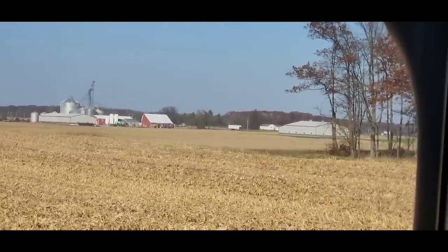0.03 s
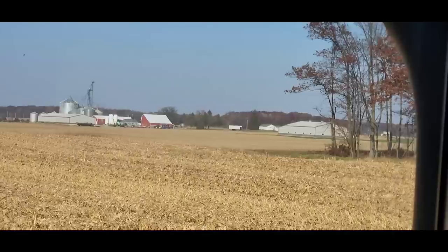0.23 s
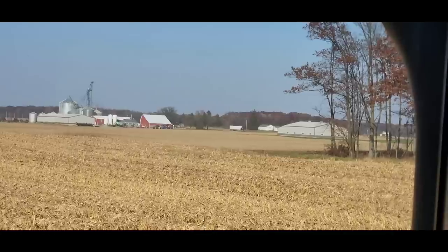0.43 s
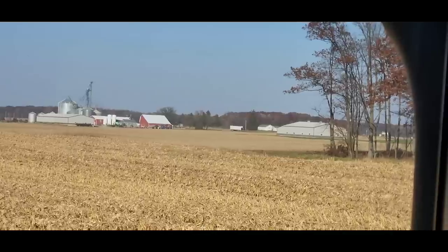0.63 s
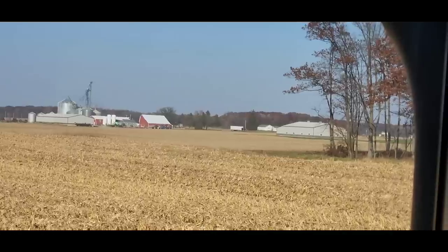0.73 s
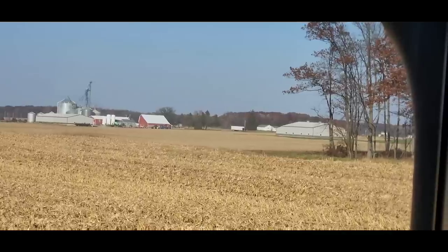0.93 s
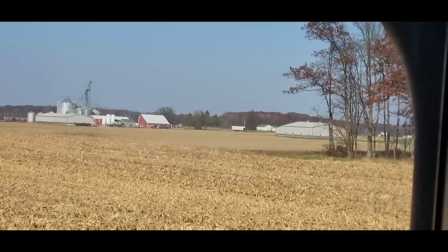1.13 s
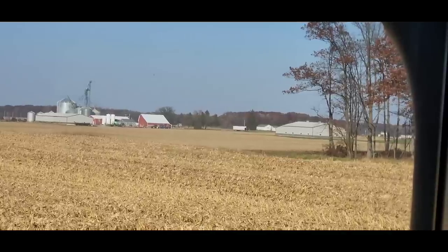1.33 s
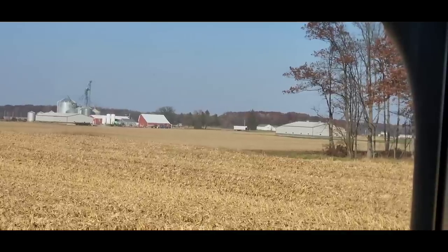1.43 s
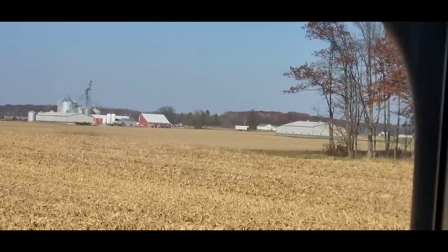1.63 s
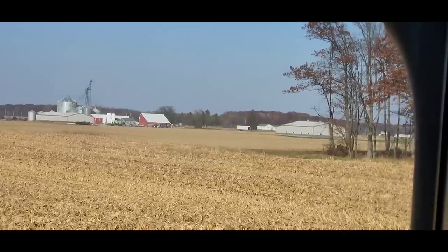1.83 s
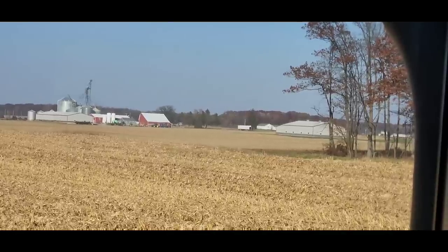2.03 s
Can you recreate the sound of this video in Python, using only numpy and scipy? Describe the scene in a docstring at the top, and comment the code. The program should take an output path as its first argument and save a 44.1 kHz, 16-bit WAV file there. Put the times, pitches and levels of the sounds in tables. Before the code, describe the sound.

Inside the cab of a working combine, a continuous low drone swells and wavers over muffled machinery rush; soft thuds come in the first half, with faint gear whine and thin high hiss above.

```python
"""Inside the closed cab of a combine harvester working at steady speed.
The cab booms in swells over filtered-noise rumble; soft knocks ring its low modes as decaying sines.
Shafts, belts and gears hum and whine as sines, two hums and a faint whistle vary in pitch,
and shaped noise makes the rush of threshing and fans, with a hiss above.
A thin, very high sizzle of narrow-band noise flutters on top."""
import sys
import numpy as np
from scipy import signal
from scipy.fft import rfft, irfft, next_fast_len
from scipy.io import wavfile
from scipy.ndimage import map_coordinates

SR = 44100
rng = np.random.default_rng(int(sys.argv[2]) if len(sys.argv) > 2 else 0)


def dump(signal):
    """Clip the signal to [-1, 1] and save it as 16-bit WAV at the path in sys.argv[1]."""
    limited = np.clip(np.atleast_2d(signal).T, -1, 1)
    pcm = np.round(limited * 32767).astype(np.int16)
    wavfile.write(sys.argv[1], SR, pcm)


N = 91816
TIME_S = np.arange(N) / SR


def amp(db):
    """Decibels to gain."""
    return 10 ** (np.asarray(db) / 20)


def unit(x):
    """Scale to rms 1 over all channels."""
    return x / np.sqrt(np.mean(x ** 2) + 1e-20)


def along(points, hz):
    """Read (Hz, value) points on a log frequency axis."""
    point_hz, value = np.transpose(points)
    return np.interp(np.log(hz + 1), np.log(point_hz + 1), value)


def curve(rows):
    """One value per sample from (seconds, value) rows."""
    return np.interp(TIME_S, *np.transpose(rows))


def wobble(knots_per_s):
    """Smooth random curve through normally distributed knots."""
    knots = rng.standard_normal(1024)
    return map_coordinates(knots, [TIME_S * knots_per_s], mode="mirror")


def filtered(x, response):
    """Multiply the spectrum of x by a response of frequency."""
    size = next_fast_len(N + SR // 2)  # zero padding
    hz = np.fft.rfftfreq(size, 1 / SR)
    return irfft(rfft(x, size) * response(hz), size)[..., :N]


def sides(difference):
    """Split a left-right difference over the two channels."""
    return np.array([[.5], [-.5]]) * difference


def tone(hz, lead_rad=0):
    """Stereo sine of rms 1 on a pitch curve, left ahead of right by lead_rad."""
    phase = 2 * np.pi * (np.cumsum(hz) / SR + rng.random())
    return np.sqrt(2) * np.sin(phase + sides(lead_rad))


# Stereo width of all noise. Each row: frequency in Hz, side level under the mid in dB.
SIDE_WIDTH = [(40, -30), (90, -12.5), (160, -12.5), (260, -12), (380, -3), (560, -4), (700, -3.5),
              (1000, 1), (1450, 2), (2000, -1), (4000, -0.3), (12000, 1)]
# Stereo balance of all noise. Each row: frequency in Hz, left over right in dB.
NOISE_BALANCE = [(50, 2), (100, 1.5), (200, 0), (400, 0), (700, 0), (850, -1), (1300, 1.5), (2200, -3),
                 (4300, -1.5), (5300, 2), (7000, -2), (14000, 6)]


def noise(spectrum):
    """Stereo noise of rms 1: mid and side sources, alike in the bass and diffuse in the treble."""
    def side_gain(hz):
        return amp(along(SIDE_WIDTH, hz))

    def colour(hz):
        level_db = along(spectrum, hz) + sides(along(NOISE_BALANCE, hz))
        return amp(level_db) / np.hypot(1, side_gain(hz))  # total power independent of width

    mid, side = rng.standard_normal((2, N))
    side = filtered(side, side_gain)
    return unit(filtered(np.array([mid + side, mid - side]), colour))


# Boom swells. Each row: time in seconds, level in dB before BOOM_TRIM_DB.
BOOM_LEVEL = [(0, -35), (.03, -34.5), (.12, -46.5), (.18, -36), (.22, -30), (.32, -37), (.42, -36),
              (.455, -21.5), (.52, -45.5), (.59, -25), (.68, -40), (.8, -35), (.9, -33), (1.0, -36.5),
              (1.07, -55), (1.15, -34), (1.22, -32.5), (1.37, -42.5), (1.47, -34), (1.56, -34), (1.64, -47),
              (1.7, -29.5), (1.77, -44.5), (1.83, -31.5), (1.92, -41.5), (2.05, -32)]
# Boom pitch. Each row: time in seconds, pitch in Hz before the random wander.
BOOM_PITCH_HZ = [(0, 81.5), (.22, 91.5), (.33, 89), (.41, 77.5), (.47, 86), (.57, 85.5), (.66, 92.5),
                 (.77, 79), (.89, 89), (1.0, 77.5), (1.14, 87), (1.24, 81), (1.46, 87), (1.55, 83),
                 (1.7, 88), (1.85, 81.5), (2.05, 90.5)]
BOOM_WANDER_HZ, BOOM_WANDER_KNOTS_PER_S, BOOM_TRIM_DB = 3.63, 30.39, -2.5
# Rumble spectrum. Each row: frequency in Hz, relative density in dB per Hz.
RUMBLE_SPECTRUM = [(30, -37.5), (50, -5.5), (62, -.5), (80, -3), (115, -1.5), (150, -10.5), (250, -31.5),
                   (600, -105)]
RUMBLE_DB = -38.5
# Deepest rumble. Each row: time in seconds, level in dB.
DEEP_RUMBLE_LEVEL = [(0, -37), (.2, -58), (.37, -36.5), (.46, -45), (.67, -43), (.75, -47), (1.05, -46.5),
                     (1.15, -38), (1.25, -44), (1.49, -35), (1.57, -50), (1.71, -41.5), (1.78, -48),
                     (2.05, -45)]
# Deepest rumble spectrum. Each row: frequency in Hz, relative density in dB per Hz.
DEEP_RUMBLE_SPECTRUM = [(15, -25), (26, 3.5), (37, 11), (45, 4), (54, 11), (66, -21), (100, -57),
                        (200, -120)]


def cab():
    """The cab's air resonance booms in uneven swells of wavering pitch over two bands of rumble."""
    boom_hz = curve(BOOM_PITCH_HZ) + BOOM_WANDER_HZ * wobble(BOOM_WANDER_KNOTS_PER_S)
    boom = amp(curve(BOOM_LEVEL) + BOOM_TRIM_DB) * tone(boom_hz)
    rumble = amp(RUMBLE_DB) * noise(RUMBLE_SPECTRUM)
    deep_rumble = amp(curve(DEEP_RUMBLE_LEVEL)) * noise(DEEP_RUMBLE_SPECTRUM)
    return boom + rumble + deep_rumble


# Drone of the heavy shafts. Each row: mean pitch in Hz, level in dB.
SHAFT_DRONE = [(45, -44.5), (82.7, -46), (120.3, -52.5), (164, -54.5), (206, -60), (242, -60), (281, -62.5),
               (298, -63.5), (315, -56.5), (345, -64.5), (361, -65.5), (382, -66.5), (416, -58)]
# Tones of the drive. Each row: mean pitch in Hz, level in dB before flutter and WHINE_TRIM_DB,
# left over right in dB, left lead in radians.
DRIVE_WHINES = [(483.4, -58.5, -1, -.4), (495, -64.5, 3, .7), (517.6, -63, 5, 1.3), (562.6, -65, 8, .6),
                (570.1, -56, 6, -.2), (705, -71, 12, -1.4), (725, -66, 8, -2.1), (765.3, -68, -5, -.7),
                (836.6, -66.5, 7, -.1), (906, -72, 0, 1), (976, -72, 0, -1.1), (1087.4, -74, -12, 1.4),
                (1140.2, -58.3, 4, -.3), (1152.1, -61, 3, -2.2), (1170.2, -70.5, 3, -3),
                (1444.4, -74, 0, -1.3), (1449.8, -73, 2, -3), (1710.3, -65.5, -4, -1.7),
                (1755.4, -76, 1, .1), (1812.5, -74, 3, -.7), (1994, -75, 0, .6), (2054, -78, -2, -1),
                (2114, -77, 0, 1), (2158.4, -73, 2, -.8), (2280.6, -78, -5, .6), (2295.5, -72.5, -11, 1.2),
                (2340.6, -74, 6, -2.6), (2537, -82, 4, 1.5), (5488, -89, 5, -2.4)]
SPEED_DRIFT_RATIO, SPEED_DRIFT_KNOTS_PER_S = 0.00062, 4.4
WHINE_FLUTTER_DB, WHINE_FLUTTER_KNOTS_PER_S, WHINE_TRIM_DB = 2.5, 10.99, 1.5


def drive():
    """Shafts drone and gears whine, all scaled by one slightly drifting speed; close pairs beat."""
    speed = 1 + SPEED_DRIFT_RATIO * wobble(SPEED_DRIFT_KNOTS_PER_S)
    drone = sum(amp(db) * tone(hz * speed) for hz, db in SHAFT_DRONE)
    whine = 0
    for hz, db, pan_db, lead_rad in DRIVE_WHINES:
        flutter_db = WHINE_FLUTTER_DB * wobble(WHINE_FLUTTER_KNOTS_PER_S)
        whine += amp(db + sides(pan_db) + flutter_db) * tone(hz * speed, lead_rad)
    return drone + amp(WHINE_TRIM_DB) * whine


# Gliding hum, probably a fan or pump under changing load.
# Each row: time in seconds, pitch in Hz, level in dB.
GLIDING_HUM = [(0, 308, -45), (0.149, 277, -50), (0.299, 245, -50), (.55, 245, -53), (0.721, 265, -50.5),
               (.87, 276, -43.5), (0.938, 295, -65), (1.011, 309, -51.5), (1.17, 280, -50),
               (1.32, 262, -54), (1.549, 266, -55), (1.68, 272, -48), (1.85, 262, -51), (1.991, 243, -46.5),
               (2.08, 250, -50)]
# Wavering gear hum. Each row: time in seconds, level in dB before HUM_TRIM_DB.
GEAR_HUM_LEVEL = [(0, -61), (.32, -65), (.4, -65), (.57, -46.5), (.7, -55), (.83, -47), (.97, -50),
                  (1.15, -59), (1.4, -68), (1.6, -54), (2.05, -58.5)]
HUM_MEAN_HZ, HUM_WANDER_HZ, HUM_WANDER_KNOTS_PER_S = 565, 6.14, 25
HUM_TRIM_DB, HUM_PAN_DB = -2.8, 5  # pan is left over right


def hums():
    """One low hum glides in pitch; a higher one wavers at random and beats with the gear tones."""
    time_s, glide_hz, glide_db = np.transpose(GLIDING_HUM)
    glide_gain = amp(curve(np.c_[time_s, glide_db]))
    glide = glide_gain * tone(curve(np.c_[time_s, glide_hz]))
    waver_hz = HUM_MEAN_HZ + HUM_WANDER_HZ * wobble(HUM_WANDER_KNOTS_PER_S)
    waver_db = HUM_TRIM_DB + curve(GEAR_HUM_LEVEL) + sides(HUM_PAN_DB)
    return glide + amp(waver_db) * tone(waver_hz)


# Whistle swells. Each row: time in seconds, level in dB before WHISTLE_TRIM_DB.
WHISTLE_SWELLS = [(0.0, -78), (0.07, -67), (0.17, -82), (.34, -84), (.39, -70.5), (.52, -76), (0.6, -71.5),
                  (0.7, -70), (0.82, -75), (0.92, -71), (1.0, -68.5), (1.1, -71), (1.14, -87), (1.19, -70),
                  (1.25, -79), (1.42, -83), (1.48, -71.5), (1.57, -83.5), (1.64, -73), (2.04, -68.5)]
# Whistle pitch. Each row: time in seconds, pitch in Hz before the random drift.
WHISTLE_PITCH_HZ = [(0, 4718), (.1, 4720), (.2, 4698), (.4, 4713), (.68, 4722), (.85, 4713), (1.08, 4716),
                    (1.19, 4695), (1.3, 4714), (1.5, 4713), (1.72, 4729), (2.08, 4725)]
WHISTLE_DRIFT_RATIO, WHISTLE_DRIFT_KNOTS_PER_S = .0005, 11
WHISTLE_TRIM_DB, WHISTLE_PAN_DB = -.5, -6  # pan is left over right


def whistle():
    """A faint sine, probably the turbocharger, swells and dips with slight shifts of pitch."""
    drift = 1 + WHISTLE_DRIFT_RATIO * wobble(WHISTLE_DRIFT_KNOTS_PER_S)
    level_db = WHISTLE_TRIM_DB + curve(WHISTLE_SWELLS) + sides(WHISTLE_PAN_DB)
    return amp(level_db) * tone(curve(WHISTLE_PITCH_HZ) * drift)


# Rush spectrum. Each row: frequency in Hz, relative density in dB per Hz.
RUSH_SPECTRUM = [(60, -11), (140, -2.5), (210, 0), (290, -1.5), (360, -7), (440, -8.5), (560, -7),
                 (650, -12), (760, -12.5), (880, -12), (1050, -14.5), (1370, -15.5), (1500, -18),
                 (1640, -20), (1730, -17.5), (1860, -21), (1980, -18), (2150, -18), (2230, -21.5),
                 (2310, -18.5), (2500, -23), (2800, -25), (3800, -37), (6000, -67.5)]
RUSH_MEAN_DB, RUSH_FLUTTER_DB, RUSH_FLUTTER_KNOTS_PER_S = -40, 0.28, 11.68
# Hiss. Each row: time in seconds, level in dB before HISS_TRIM_DB.
HISS_FADE = [(0.0, -69), (0.31, -71.5), (1.59, -73), (1.66, -72), (2.04, -72)]
# Hiss spectrum. Each row: frequency in Hz, relative density in dB per Hz.
HISS_SPECTRUM = [(1500, -31), (3000, -2), (3800, 2), (4700, -3.5), (6000, -8), (7400, -8.5), (8400, -19.5),
                 (9500, -28), (10300, -39), (13500, -30)]
HISS_TRIM_DB = 10.5


def threshing():
    """Crop and air rush through the machine, muffled by the cab, with a light hiss above."""
    rush_db = RUSH_MEAN_DB + RUSH_FLUTTER_DB * wobble(RUSH_FLUTTER_KNOTS_PER_S)
    rush = amp(rush_db) * noise(RUSH_SPECTRUM)
    hiss = amp(HISS_TRIM_DB + curve(HISS_FADE)) * noise(HISS_SPECTRUM)
    return rush + hiss


# Sizzle. Each row: time in seconds, level in dB before flutter and SIZZLE_TRIM_DB.
SIZZLE_SWELLS = [(0, -73.5), (.28, -68.5), (.44, -71), (.6, -66.5), (.76, -66), (.92, -77.5), (1.0, -73.5),
                 (1.08, -66), (1.16, -64), (1.24, -71), (1.4, -63), (1.52, -75.5), (1.64, -66.5),
                 (1.8, -74), (1.87, -64.5), (1.96, -77), (2.04, -71.5)]
# Sizzle spectrum. Each row: frequency in Hz, relative density in dB per Hz.
SIZZLE_SPECTRUM = [(7000, -100), (10000, -59), (11000, -45), (11300, -2), (11550, -11), (11750, 5),
                   (11950, 0.5), (12150, 10), (12400, -11), (12800, -9), (13100, -26), (14500, -47)]
SIZZLE_FLUTTER_DB, SIZZLE_FLUTTER_KNOTS_PER_S = 2.1, 49.0
SIZZLE_TRIM_DB, SIZZLE_PAN_DB = 0.5, -9  # pan is left over right
# Thin top hiss. Each row: time in seconds, level in dB.
TOP_HISS_LEVEL = [(0, -64), (.25, -69.5), (.45, -73), (.7, -83.5), (2.05, -87.5)]
# Thin top hiss spectrum. Each row: frequency in Hz, relative density in dB per Hz.
TOP_HISS_SPECTRUM = [(6000, -24), (8000, 8.5), (9200, -0.5), (10200, -10), (11500, -2), (13500, 2),
                     (15200, 0)]


def sizzle():
    """A narrow band of very high noise flutters over a thin hiss that fades early."""
    flutter_db = SIZZLE_FLUTTER_DB * wobble(SIZZLE_FLUTTER_KNOTS_PER_S)
    band_db = SIZZLE_TRIM_DB + curve(SIZZLE_SWELLS) + sides(SIZZLE_PAN_DB) + flutter_db
    top_hiss = amp(curve(TOP_HISS_LEVEL)) * noise(TOP_HISS_SPECTRUM)
    return amp(band_db) * noise(SIZZLE_SPECTRUM) + top_hiss


# Jolts that shake the cab. Each row: start in seconds, level in dB.
CAB_JOLTS = [(0.215, -30.5), (0.436, -39), (0.583, -29.5), (.795, -28), (1.143, -24.5)]
# Modes they ring. Each row: frequency in Hz, mean relative level in dB, 60 dB decay time in seconds.
LOW_CAB_MODES = [(50.4, 0, 0.091), (82.3, 5, 0.12), (107, -15, 0.066), (165, -11, 0.25), (230, -12, 0.19),
                 (310, -13, 0.047)]
JOLT_ATTACK_S, MODE_SPREAD_DB = 0.003, 0.99


def jolts():
    """Soft knocks from the running gear ring the cab's low modes as exponentially decaying sines."""
    knocks = np.zeros(N)
    for start_s, jolt_db in CAB_JOLTS:
        t = np.maximum(TIME_S - start_s, 0)
        ring = 0
        for hz, mode_db, t60_s in LOW_CAB_MODES:
            decay_db = mode_db + rng.normal(0, MODE_SPREAD_DB) - 60 * t / t60_s
            ring += amp(decay_db) * np.sin(2 * np.pi * hz * t)
        attack = 1 - np.exp(-t / JOLT_ATTACK_S)
        knocks += amp(jolt_db) * ring * attack
    return knocks


def scene():
    """Everything heard from the driver's seat."""
    return cab() + drive() + hums() + whistle() + threshing() + sizzle() + jolts()


LOW_CUT_HZ, TOP_HZ = 35, 15450


def record(dry):
    """The microphone loses the deepest bass, and nothing passes above the band limit."""
    low_cut = signal.butter(3, LOW_CUT_HZ, "high", fs=SR, output="sos")
    return filtered(signal.sosfilt(low_cut, dry), lambda hz: hz < TOP_HZ)


dry = scene()
out = record(dry)
dump(out)
```